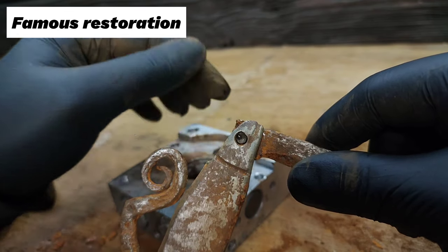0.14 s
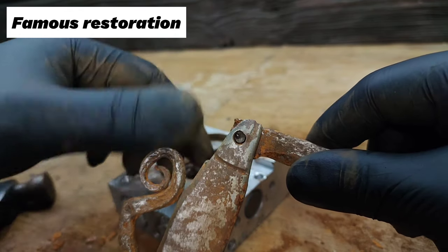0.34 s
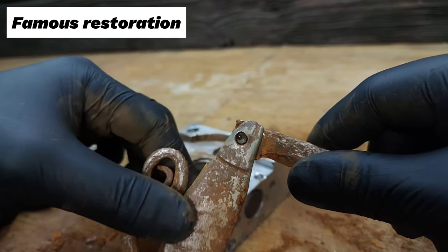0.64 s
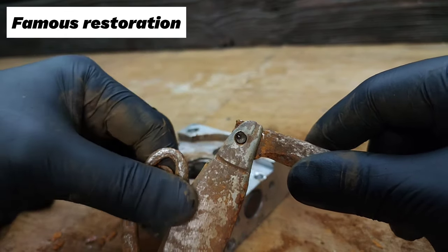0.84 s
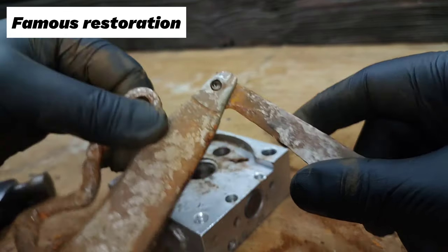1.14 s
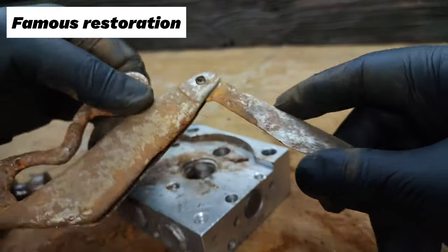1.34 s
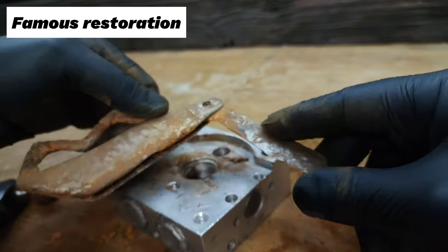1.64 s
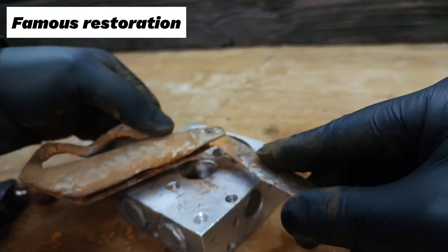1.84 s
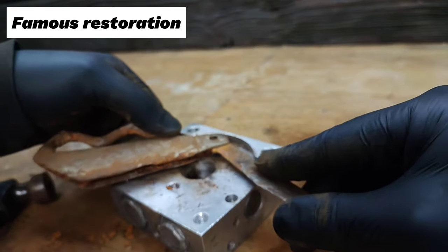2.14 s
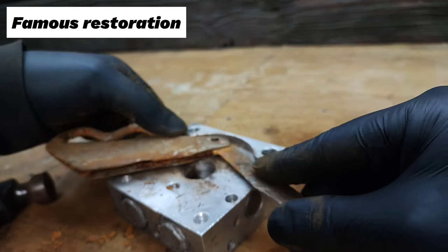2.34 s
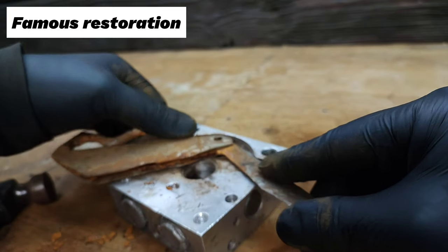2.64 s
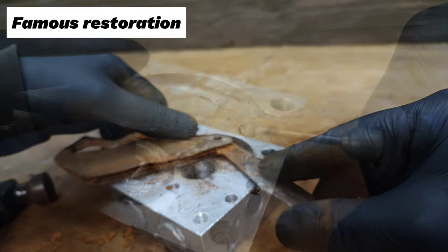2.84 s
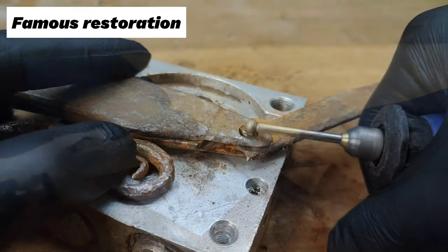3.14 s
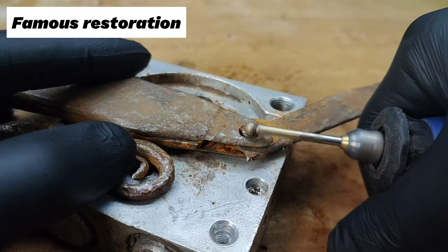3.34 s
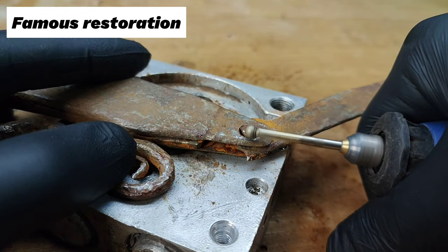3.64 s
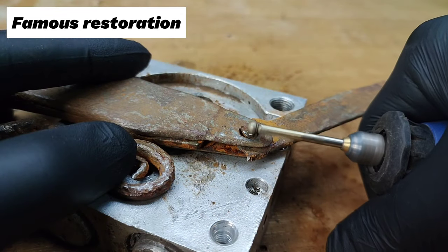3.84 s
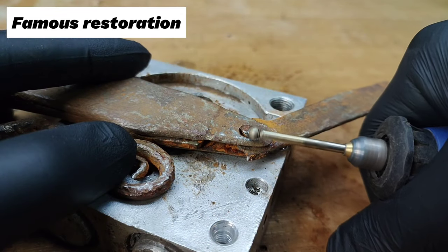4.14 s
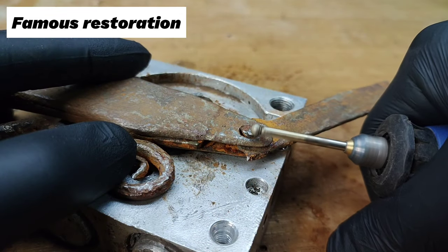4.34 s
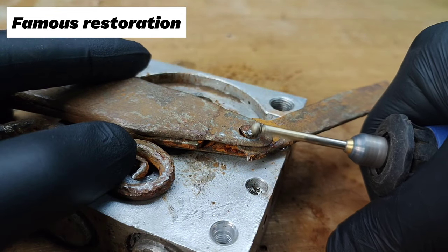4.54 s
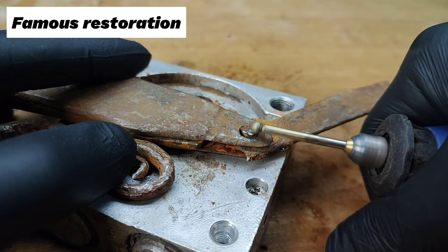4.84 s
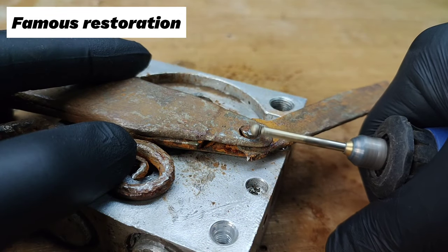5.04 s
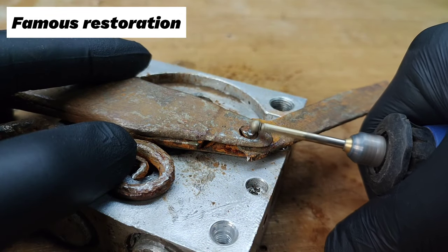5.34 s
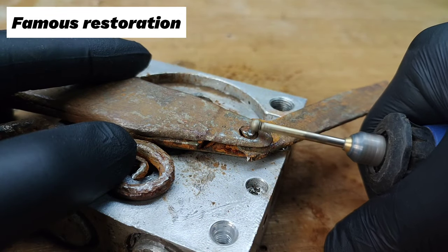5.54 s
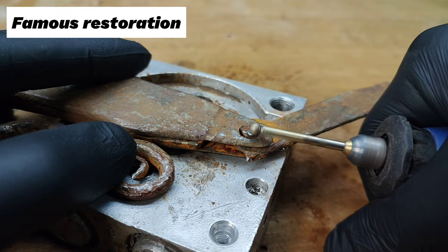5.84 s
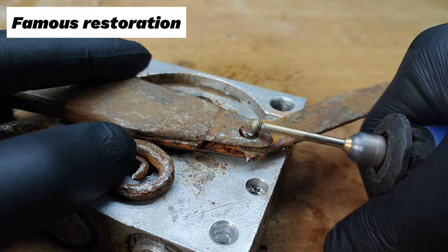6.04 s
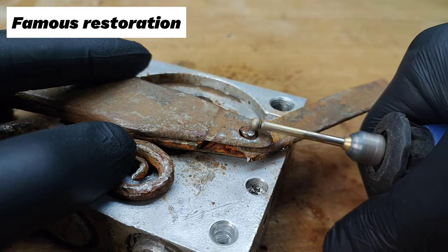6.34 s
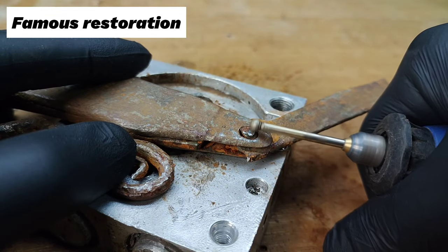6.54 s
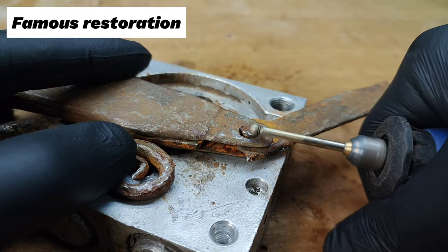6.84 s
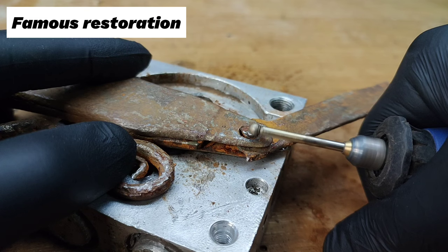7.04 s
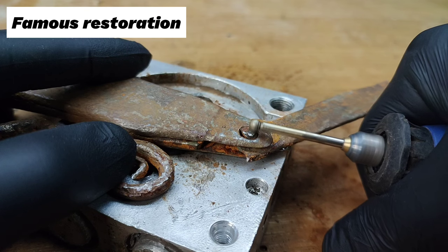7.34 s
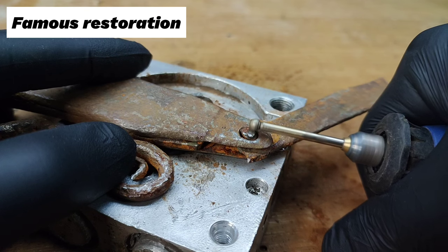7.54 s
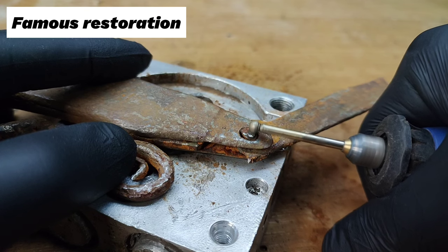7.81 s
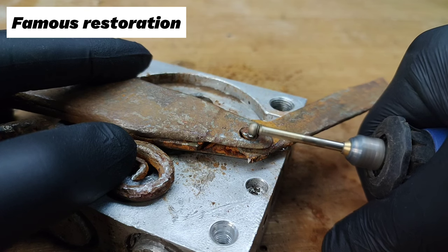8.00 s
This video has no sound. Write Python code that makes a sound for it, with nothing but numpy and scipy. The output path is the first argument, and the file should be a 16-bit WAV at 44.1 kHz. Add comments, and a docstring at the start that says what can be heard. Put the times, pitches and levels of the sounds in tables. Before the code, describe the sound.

A rusty folding knife faintly clicks and scrapes onto a metal block, then a small rotary grinder bites in, buzzing harshly and slowly bogging down.

```python
"""A small workshop, heard close to the bench on two microphones. A rusty folding knife is handled and laid on a
metal block: its joint and hook click as ringing modes, rubs are gritty noise, the wooden bench thuds.
Then a rotary tool with a burr grinds the rivet: slightly out of true, it bites once a turn with strikes that
mostly repeat and ring the metal. Under load the motor slows and each bite lasts longer. The bench shakes,
the motor hums and whines, and the room answers over faint air."""
import sys
import numpy as np
from scipy import signal
from scipy.fft import rfft, irfft
from scipy.io import wavfile
from scipy.ndimage import uniform_filter1d, map_coordinates

SR = 44100
rng = np.random.default_rng(int(sys.argv[2]) if len(sys.argv) > 2 else 0)


def inscribe(sig):
    """Save sig as 16-bit PCM at rate SR to the path in sys.argv[1].

    A 1-D sig is mono; a 2-D sig holds one channel per row.
    Samples are clipped to [-1, 1] before scaling.
    """
    pcm = np.round(np.clip(np.atleast_2d(sig).T, -1, 1) * 32767)
    wavfile.write(sys.argv[1], SR, pcm.astype(np.int16))


N = 360297
TIME = np.arange(N) / SR  # s
HZ = np.fft.rfftfreq(N, 1 / SR)

# Spindle speed, sagging under load. Each row: time in seconds, turns per second.
SPINDLE = [(2.98, 220.1), (3.17, 219.0), (3.4, 213.0), (3.41, 211.2), (3.6, 204.1), (4.01, 198.5),
           (4.27, 193.1), (4.5, 192.5), (4.99, 194.4), (5.58, 189.3), (6.0, 183.0), (6.1, 183.5),
           (6.36, 180.6), (6.87, 172.6), (6.96, 172.3), (7.24, 174.3), (7.58, 171.8), (7.94, 163.1),
           (8.07, 161.9), (8.17, 161.7)]
IDLE_HZ, LOADED_HZ = 220, 162  # turns per second at load 0 and load 1
# Share of each turn that the burr spends in the metal, running free and at full load.
CONTACT_IDLE, CONTACT_LOADED = 0.33, 0.53
# Pressure of the burr, eased on and then held against the rivet. Each row: time in seconds, level in dB.
CUT_LEVEL = [(2.99, -48), (3.2, -31.5), (3.44, -29.5), (3.52, -27.5), (3.9, -22), (4.65, -23.5),
             (5.1, -22.5), (5.6, -21.5), (7.2, -23), (8.17, -23)]
# The burr digs in. Each row: middle in seconds, length in seconds, change of the cut in dB, of the bench in dB.
DIGS = [(3.96, 0.17, 1.5, 6), (4.2, 0.088, 0.5, 13), (4.31, 0.24, 2, -7), (4.49, 0.26, 2.5, -4),
        (4.96, 0.44, 2, 1), (5.68, 0.13, 1, -2), (5.96, 0.16, -0.5, 16), (6.46, 0.087, 2, 8),
        (6.99, .1, 1, 13), (7.33, 0.065, 4, 21), (8.15, 0.11, 0, 21)]
# Brief changes of the cut's level, mostly dips. Each row: middle in seconds, length in seconds, change in dB.
DIPS = [(3.76, 0.081, -2.5), (4.02, 0.089, -5.5), (4.155, 0.099, -2.5), (4.235, 0.082, -3.5),
        (4.39, 0.17, -3.5), (4.74, 0.26, -0.5), (5.25, 0.077, 0.5), (5.77, 0.15, -5.5), (6.1, 0.22, -3),
        (6.28, 0.14, -2), (7.14, 0.054, -5.5)]
# Clean shavings, blade ringing and chips flying. Each row: middle in seconds, length in seconds,
# lift of the blade in dB, lift of the chips in dB.
SHAVINGS = [(3.55, 0.55, 0, 4.5), (4.09, 0.1, 1, 5), (4.26, 0.047, 8, 1), (5.15, 0.12, 6, 4),
            (5.43, 0.075, 0, 0), (5.68, 0.73, 3, 2), (5.92, 0.43, 1, 1.5), (6.42, 0.17, 1.5, 0),
            (6.76, 0.31, 1, 3.5), (7.45, .14, 3, 0), (7.92, 0.33, 1.5, 4)]
# The burr skids and the knife's body growls. Each row: middle in seconds, length in seconds,
# loose strikes added, as a ratio to the repeating ones.
SKIDS = [(3.93, 0.2, 0.66), (4.58, 1, 0.46), (6.55, 1, 0.27), (7.88, 1, 0.54)]
STEADY_SKID = 0.36  # the same ratio at full load while the burr tracks its groove
BETWEEN, GRAZE = 0.25, 0.19  # loose rubbing, and strikes between bites, relative to a bite
# Broad colour of the cut. Each row: frequency in Hz, gain in dB.
CUT_COLOUR = [(25, 12.5), (70, -18.5), (130, 1.5), (270, -0.5), (450, -2), (700, -4.5), (1200, 3),
              (1750, 2.5), (2100, -2), (3350, -6.5), (4800, -4.5), (6700, -4), (9200, -7.5), (10400, -6),
              (12500, -8.5), (14400, -9.5)]
# Resonances of knife, block and shank. Each row: frequency in Hz, width in Hz, lift in dB at a light touch,
# lift in dB bearing down.
BODY = [(294, 25, 5.5, 1), (563, 10.3, 4.5, 19.5), (863, 155, 8, 11), (1526, 96, 5, 1.5),
        (1940, 160, 5, 4.5), (2484, 405, 6.5, 9.5), (3130, 83, 5, 6), (4110, 540, 11, 7.5),
        (4620, 310, 5, 5.5), (5030, 185, 4.5, 8.5), (5940, 260, 5.5, 7), (6430, 200, 4.5, 2),
        (7100, 370, 3, 4.5), (7655, 760, 8, 6), (8770, 260, 3.5, 3.5), (9220, 380, 6.5, 2),
        (11420, 970, 6.5, 8.5), (13000, 1900, 3.5, 7)]
HEAVY_LOAD = 0.61  # load (0-1) above which the bearing-down lifts take over
# How the metal radiates to the two microphones. Each row: frequency in Hz, radians by which the left leads.
LEAD = [(200, -1.5), (520, 4.5), (1000, -2), (1700, -3), (2400, -2), (3300, -0.9), (4300, -1.75),
        (5000, -3), (5700, -0.1), (7800, -0.55), (9300, -1.5), (11000, -1.5)]
# Balance of the tool between the microphones. Each row: frequency in Hz, left minus right in dB.
BALANCE = [(60, 37), (110, -4), (200, 1.5), (380, 6.5), (690, 0.5), (1270, -6.5), (2350, 1.5), (4320, -1.5),
           (7960, -2.5), (14700, 5)]
# The burr falls in step with its own marks and a resonance sings. Each row: middle in seconds,
# length in seconds, frequency in Hz, width in Hz, level in dB before the fade in and out.
SINGS = [(3.127, 0.08, 2360, 500, -29), (3.297, 0.28, 4520, 696, -30.5), (3.347, 0.33, 2430, 500, -41),
         (3.554, 0.45, 4340, 600, -26), (3.563, 0.38, 5850, 507, -30.5), (3.789, 0.25, 2400, 560, -20.5),
         (3.933, 0.32, 4110, 500, -26), (3.96, .14, 7580, 600, -26), (4.064, 0.19, 2530, 238, -23),
         (4.086, .12, 4940, 450, -22), (4.188, 0.089, 4160, 450, -28), (4.198, 0.12, 7650, 550, -21.5),
         (4.32, 0.061, 4300, 500, -30), (4.391, 0.16, 2350, 545, -18.5), (4.457, 0.23, 1940, 220, -28),
         (4.54, 0.1, 7460, 500, -25.5), (5.04, 0.084, 7550, 600, -22), (5.054, 0.077, 2480, 250, -25),
         (5.114, 0.67, 4340, 400, -21.5), (5.17, .14, 9200, 450, -22), (5.33, 0.11, 7700, 550, -24.5),
         (5.486, 0.12, 4180, 447, -24), (5.658, 0.27, 4450, 850, -24), (5.684, 0.17, 5850, 450, -30.5),
         (5.822, 0.16, 5870, 550, -24.5), (5.824, .14, 4840, 550, -24), (5.927, 0.16, 11350, 500, -23.5),
         (5.964, 0.13, 2420, 500, -24), (6.034, .1, 4150, 400, -25.5), (6.325, 0.28, 6950, 500, -34),
         (6.346, 0.11, 4100, 450, -37), (6.477, 0.14, 2450, 402, -23.5), (6.667, .16, 8100, 600, -25),
         (6.975, 0.18, 2520, 300, -31), (7.118, 0.45, 4170, 400, -23), (7.523, 0.2, 4300, 450, -26),
         (7.88, 0.21, 1890, 250, -26.5), (8.02, 0.074, 3800, 500, -21.5), (8.16, 0.13, 4200, 500, -20)]
# Hum of the imbalance, once a turn. Each row: time in seconds, level in dB before the motor's own trim.
HUM = [(2.98, -49.5), (3.31, -50), (3.47, -26), (3.82, -37), (3.96, -27.5), (4.3, -30.5), (4.42, -43),
       (4.55, -34), (5.15, -32.5), (5.6, -27.5), (5.9, -23.5), (6.14, -30), (6.48, -23.5), (6.82, -35),
       (7.3, -30.5), (7.86, -33.5), (7.97, -49), (8.09, -26.5)]
# Its overtone, twice a turn. Each row: time in seconds, level in dB before the same trim.
OVERTONE = [(2.979, -73), (3.48, -38), (3.831, -45.5), (3.96, -37.5), (4.3, -36), (4.65, -42), (5.35, -35),
            (5.5, -66), (5.7, -31.5), (5.88, -37.5), (6.0, -48), (6.3, -45.5), (6.68, -32), (6.82, -44.5),
            (7.25, -37.5), (7.46, -46), (7.62, -31), (8.05, -28)]
# Motor whine. Each row: multiple of the spindle speed, level in dB before pressure and resonances.
WHINE = [(3, -44), (4, -46), (5, -49), (6, -45), (7, -42.5), (8, -42.5), (9, -42), (10, -44.5), (11, -39.5),
         (12, -44.5), (13, -50.5), (14, -42.5)]
# Light clicks of the knife's joint. Each row: time in seconds, peak in dB before the ticks' common lift,
# brightness in Hz, factor on the modes' pitch.
TICKS = [(0.788, -53, 3940, 1), (0.9637, -54, 2450, 1), (1.1721, -40, 3000, 0.83),
         (1.3548, -49, 2940, 0.93), (1.531, -47, 7000, .98), (1.5683, -30.5, 4130, 1),
         (1.6102, -50, 7660, 1), (1.817, -50, 3020, 0.75), (2.001, -46.5, 3000, 1)]
# Ringing of the rusty joint. Each row: frequency in Hz before that factor, level in dB, T60 in seconds.
JOINT_MODES = [(3015, -16, 0.044), (3390, -1, 0.025), (3710, 1, .022), (4300, -8, .02), (4640, 0, 0.041),
               (5060, 0, 0.039), (5400, -6, .02), (6900, -7, .048), (7600, -9, 0.06), (8403, -10, .066),
               (9324, -14, .09), (11300, -8, 0.022)]
# The knife's curled hook slips and taps. Each row: time in seconds, peak in dB.
SLIPS = [(1.203, -45), (1.218, -51), (1.2423, -42), (1.26, -36), (1.282, -55), (1.305, -50)]
# Ringing of the hook. Each row: frequency in Hz, level in dB, T60 in seconds.
HOOK_MODES = [(2930, -5, 0.038), (4360, 2, 0.035), (4760, -16, 0.27), (5400, -13, .03), (7375, -14.5, 0.42),
              (11960, -17, .14)]
# The knife is set down on the block. Each row: time in seconds, peak in dB, dulling in dB per octave.
KNOCKS = [(2.474, -42, 3), (2.853, -23, 2)]
# Ringing of the block. Each row: frequency in Hz before the knock's pitch factor, level in dB, T60 in seconds.
BLOCK_MODES = [(580, -12, 0.04), (740, -0.5, .03), (1546, -3, 0.039), (3110, -3, 0.038), (3400, -2, 0.022),
               (3780, 1, 0.038), (7880, -13, .05)]
# One hard clack of steel on steel: seconds, peak in dB, dulling in dB per octave (negative brightens).
CLACK_S, CLACK_DB, CLACK_DULL_DB = 2.957, -8, -5
# Ringing of the struck steel. Each row: frequency in Hz before the clack's pitch factor, level in dB,
# T60 in seconds.
STEEL_MODES = [(625, -17, 0.04), (1766, 16, 0.022), (2900, -17, 0.02), (3404, 11, 0.034), (3800, 2, 0.019),
               (4760, 5, 0.038), (4900, 0, 0.018), (6360, 4.5, 0.0098), (7000, 1, 0.029),
               (10200, -24, 0.015)]
# Thuds of the bench. Each row: start in seconds, level in dB, T60 in seconds, lower and upper edge in Hz.
THUDS = [(0.631, -44, 0.43, 25, 90), (2.472, -39, 0.56, 40, 336), (2.851, -41.5, 0.4, 40.6, 645),
         (2.958, -26.5, 1.4, 50, 77), (2.96, -29, 0.58, 122, 237)]
# Gloves and rust rubbing. Each row: start in seconds, length in seconds, level in dB, centre in Hz.
RUBS = [(0, 0.12, -74, 7350), (0.273, 0.13, -59, 3500), (0.76, 0.25, -59, 6000), (1.103, 0.23, -58.5, 700),
        (1.134, 0.45, -61, 4970), (1.473, 0.42, -58.5, 4970), (1.962, 0.17, -56, 7000),
        (2.434, 0.24, -56.5, 2800)]
# Low rumble of the hands on the bench. Each row: time in seconds, level in dB before the rumble's lift.
RUMBLE = [(0.05, -47.5), (0.5, -50), (0.7, -41.5), (1.45, -49), (1.9, -46), (2.15, -50), (2.6, -49),
          (3.0, -38), (3.25, -49)]
# Colour of that rumble. Each row: frequency in Hz, gain in dB.
RUMBLE_COLOUR = [(10, -2), (22, 3), (30, -13), (42, -9), (70, -14), (130, -47), (300, -54), (1000, -70)]
# Decay of the room. Each row: frequency in Hz, T60 in seconds.
ROOM_T60 = [(100, 1), (1000, 0.89), (5000, 0.73), (14000, 0.011)]
# Colour of the air. Each row: frequency in Hz, gain in dB.
AIR_COLOUR = [(59, -41), (100, 0.5), (355, -9.5), (1460, -22.5), (3340, -26.5), (5860, -31.5), (7360, -28),
              (10000, -35.5), (12600, -31), (14300, -31)]
AIR_DB = -54
EDGE_HZ = 14450  # upper limit of the recorder


def grinding(turns, apart=0.72, bench_db=-14, judder_db=1.76):
    """The bites ring the knife; load brightens the ring, skids and shavings shift which parts ring most."""
    effort, skid = load(), swells(SKIDS)[0]
    blade_lift, chips_lift = swells(SHAVINGS)
    push, drag = (bites(turns, STEADY_SKID * effort + skid) for _ in range(2))
    x = through_body(radiated(push, drag, apart), read(CUT_COLOUR, HZ))
    close_echoes = echoes(x, [(200, 0.062), (10000, 0.007)], gap_s=0.00013)
    x = band(x + amp(bench_db) * close_echoes, 41, SR, order=1)

    low = band(x, 1, 1850, order=14)
    handle = band(x, 1850, 2800, order=14)
    blade = band(x, 5200, 6600, order=14)
    chips = band(x, 9800, SR, order=14)
    shank = x - low - handle - blade - chips
    parts = [(shank, 1.5 * effort),
             (low, -11 + 6 * skid),
             (handle, -8.5 + 3 * effort),
             (blade, -11 + 6 * effort + blade_lift),
             (chips, -6.5 + 2 * effort + chips_lift)]
    level_db = cut_db()
    out = np.zeros((2, N))
    for part, db in parts:
        # each part swells and sinks a little as the hand judders
        out += steadied(part, span_s=0.057) * amp(level_db + db + judder_db * wander(25))
    return out


def bites(turns, skid, uneven_db=1.4, chips=0.74, spray=1.0, spray_hz=8500):
    """One burst of strikes a turn: coarse ridges repeat, fine chips do not; grazing and spray fill the gaps."""
    count = turns.astype(int)
    force = amp(uneven_db * rng.standard_normal(count[-1] + 1))[count]
    loose, fine, rub, dust = rng.standard_normal((4, N))
    ridges = band(tooth_marks(turns, memory_turns=23), 385, 19000, order=4)
    fine = band(fine, 10000, SR, order=4)
    strikes = (ridges + skid * loose + chips * fine) / np.sqrt(1 + skid ** 2)
    cut = strikes * (biting(turns) * force + GRAZE) + BETWEEN * rub
    return unit(cut + spray * band(dust, spray_hz, SR, order=4))


def tooth_marks(turns, memory_turns, size=300):
    """The burr meets nearly the same ridges on each turn, and slowly wears new ones."""
    keep = np.exp(-1 / memory_turns)
    fresh = rng.standard_normal((int(turns[-1]) + 2, size))
    start = rng.standard_normal((1, size))
    ridges, _ = signal.lfilter([np.sqrt(1 - keep ** 2)], [1, -keep], fresh, axis=0, zi=start)
    return unit(map_coordinates(ridges.ravel(), [turns * size], order=3))


def biting(turns):
    """Force on the burr through each turn: it meets the metal once, for longer as the load grows."""
    contact = CONTACT_IDLE + (CONTACT_LOADED - CONTACT_IDLE) * load() ** 2
    return np.sqrt(np.sin(np.pi * np.minimum(turns % 1 / contact, 1)).clip(0))


def load():
    """How hard the motor labours, 0-1, read from its loss of speed."""
    return np.clip((IDLE_HZ - curves(SPINDLE)[0]) / (IDLE_HZ - LOADED_HZ), 0, 1)


def cut_db():
    """Strength of the cut: the hand's pressure, with its digs and brief dips."""
    return curves(CUT_LEVEL)[0] + swells(DIGS)[0] + swells(DIPS)[0]


def radiated(push, drag, apart):
    """Push and sideways drag radiate differently to each microphone."""
    sides = rfft([push + apart * drag, push - apart * drag])
    return irfft(sides * np.exp(1j * np.outer([.5, -.5], read(LEAD, HZ))), N)


def through_body(x, base_db):
    """Rings the metal's resonances, with light-touch lifts until the load turns heavy."""
    hz, width, *lifts = np.transpose(BODY)
    grid = np.linspace(0, SR / 2, 8192)
    peaks = .5 ** ((2 * (grid[:, None] - hz) / width) ** 2)
    light, heavy = (colour(x, base_db + np.interp(HZ, grid, peaks @ db)) for db in lifts)
    return np.where(load() > HEAVY_LOAD, heavy, light)


def singing(turns, apart=0.38, loose=0.31):
    """Strikes that repeat almost exactly from turn to turn swell through single resonances."""
    push, drag = ((tooth_marks(turns, memory_turns=29) + loose * rng.standard_normal(N)) * biting(turns)
                  for _ in range(2))
    strikes = np.pad(radiated(push, drag, apart), [(0, 0), (0, SR)], mode="reflect")
    out = np.zeros((2, N))
    for s, length, hz, width, db in SINGS:
        start, size = s - length / 2, round(length * SR)
        peak = .5 ** (2 * ((np.fft.rfftfreq(size, 1 / SR) - hz) / width) ** 2)
        excerpt = strikes[:, round(start * SR):][:, :size]
        ring = irfft(rfft(excerpt) * peak, size)
        add(out, start, amp(db) * unit(ring) * np.hanning(size) ** 0.82)
    return out


def motor(turns, shake_db=-1, unsteady_db=2.0, waver_db=3.0, rough_db=2.3, fade_db=1.0, full_db=-21):
    """Imbalance hums on the first two orders; the higher orders whine roughly through the resonances."""
    angle = 2 * np.pi * turns
    hum = np.zeros(N)
    for order, level in enumerate([HUM, OVERTONE], 1):
        hum += amp(curves(level)[0] + unsteady_db * wander(11.5)) * np.sin(order * angle)
    whine = np.zeros((2, N))
    for order, db in WHINE:
        flutter_db = waver_db * wander(25.5) + fade_db * wander(2.4) + rough_db * wander(160)
        # radians: a chance start, and a lag between the microphones that grows with the order
        phase = 2 * np.pi * rng.random() + order * 0.078 * np.array([[-1], [1]])
        whine += amp(db + flutter_db) * np.sin(order * angle + phase)
    pressed = amp(curves(CUT_LEVEL)[0] - full_db)
    return np.sqrt(2) * (amp(shake_db) * hum + pressed * through_body(whine, 0))


def bench(tremor_db=-58, low_hz=45, top_hz=110):
    """The pressed tool shakes the bench top in low noise that changes as the burr digs in."""
    pressing = np.interp(TIME, [3.35, 3.5], [0, 1])
    tremor = unit(band(noise_pair(N, apart=0.26), low_hz, top_hz, order=2))
    return pressing * amp(tremor_db + swells(DIGS)[1]) * tremor


def clicks(tick_db=5, bright_hz=5000):
    """Short snaps of the rusty joint, the ringing hook, dry knocks on the block and one hard clack."""
    out = np.zeros((2, N))
    for s, db, hz, pitch in TICKS:
        dull_db = 4 * np.log2(bright_hz / hz)
        add(out, s, amp(db + tick_db) * strike(JOINT_MODES, pitch, dull_db, blow_s=0.0011,
                                               crack=1.0, crack_t60=0.033, crack_hz=2000))
    for s, db in SLIPS:
        add(out, s, amp(db) * strike(HOOK_MODES, 1, 0, blow_s=0.0022,
                                     crack=.6, crack_t60=0.025, crack_hz=2500))
    for s, db, dull_db in KNOCKS:
        add(out, s, amp(db) * strike(BLOCK_MODES, 0.97, dull_db, blow_s=0.0032,
                                     crack=.25, crack_t60=0.019, crack_hz=300))
    add(out, CLACK_S, amp(CLACK_DB) * strike(STEEL_MODES, 0.97, CLACK_DULL_DB, blow_s=0.0024,
                                             crack=.7, crack_t60=0.017, crack_hz=300))
    return out


def strike(modes, pitch, dull_db, blow_s, crack, crack_t60, crack_hz):
    """Rough faces meet in a quick rattle of contacts that rings the modes; dulling tilts the treble down."""
    t = TIME[:SR // 4]
    ring = sum(amp(db - 60 * t / t60) * np.sin(2 * np.pi * hz * pitch * t) for hz, db, t60 in modes)
    blow = noise_pair(len(t), apart=0.51) * np.exp(-t / blow_s)
    burst = noise_pair(len(t), apart=0.79) * amp(-60 * t / crack_t60)
    snap = signal.lfilter(*signal.butter(2, crack_hz, "high", fs=SR), burst)
    rung = signal.fftconvolve(blow, ring[None], axes=1)[:, :len(t)]
    sound = unit(rung) + crack * snap
    octaves = np.log2(1 + np.fft.rfftfreq(2 * len(t), 1 / SR) / 1000)
    sound = irfft(rfft(sound, 2 * len(t)) * amp(-dull_db * octaves))[:, :len(t)]
    return sound / abs(sound).max()


def handling():
    """Hands at the bench: their rumble, decaying bands of noise for thuds, and gritty rubbing."""
    return rumbling() + thudding() + rubbing()


def rumbling(rumble_db=6):
    """Moving hands shake the bench in low coloured noise, until the tool is pressed on."""
    moving = np.interp(TIME, [3.35, 3.55], [1, 0])
    rumble = steadied(colour(noise_pair(N, apart=0.49), read(RUMBLE_COLOUR, HZ)), span_s=0.36)
    return moving * amp(curves(RUMBLE)[0] + rumble_db) * rumble


def thudding():
    """The knocked wood booms in a low band that dies away exponentially."""
    out = np.zeros((2, N))
    t = TIME[:SR]
    for s, db, t60, low_hz, top_hz in THUDS:
        edges = signal.butter(2, [low_hz, top_hz], "band", fs=SR, output="sos")
        boom = signal.sosfilt(edges, noise_pair(SR, apart=0.25))
        add(out, s, unit(boom) * amp(db - 60 * t / t60))
    return out


def rubbing():
    """Gloves and rust catch unevenly: noise of fluttering level in a broad band."""
    out = np.zeros((2, N))
    for s, length, db, hz in RUBS:
        size = round(length * SR)
        catching = amp(2.1 * wander(150) + 2 * wander(28))[:size]
        grit = noise_pair(SR, apart=1.0)[:, :size] * catching
        edges = [hz * 0.24, min(hz * 1.47, SR / 2 - 1)]
        rub = signal.lfilter(*signal.butter(1, edges, "band", fs=SR), grit)
        add(out, s, amp(db) * unit(rub) * signal.windows.tukey(size, .7))
    return out


def echoes(x, t60, gap_s):
    """Dense reflections, different on each side, each band dying at its own speed."""
    hz, t, z = signal.stft(rng.standard_normal((2, SR // 2)), SR, nperseg=128)
    tail = signal.istft(z * amp(-60 * t / read(t60, hz)[:, None]), SR, nperseg=128)[1]
    tail *= TIME[:tail.shape[1]] > gap_s
    tail /= np.linalg.norm(tail, axis=1, keepdims=True)
    return signal.fftconvolve(x, tail, axes=1)[:, :N]


def air():
    """Steady coloured noise behind everything, nearly separate at the two microphones."""
    return amp(AIR_DB) * unit(colour(noise_pair(N, apart=0.95), read(AIR_COLOUR, HZ)))


def amp(db):
    """Decibels to gain."""
    return 10 ** (np.asarray(db) / 20)


def unit(x):
    """Scales to rms 1."""
    return x / np.sqrt(np.mean(x ** 2) + 1e-20)


def steadied(x, span_s):
    """Evens out the slow swells of a stereo sound, to rms 1."""
    power = uniform_filter1d((x ** 2).mean(0), round(span_s * SR))
    return x / np.sqrt(abs(power) + 1e-12)


def curves(rows):
    """Each column of a table, at every sample."""
    s, *columns = np.transpose(rows)
    return [np.interp(TIME, s, c) for c in columns]


def swells(rows):
    """Each column of an event table as smooth rises and falls, at every sample."""
    total = 0
    for s, length, *sizes in rows:
        swell = np.cos(np.pi * np.clip((TIME - s) / length, -.5, .5)) ** 2
        total = total + np.outer(sizes, swell)
    return total


def read(points, hz):
    """A spectrum joined by straight lines over log frequency."""
    f, value = np.transpose(points)
    return np.interp(np.log(hz + 1), np.log(f), value)


def add(mix, s, sound):
    """Mixes a sound in at s seconds."""
    part = mix[..., round(s * SR):][..., :sound.shape[-1]]
    part += sound[..., :part.shape[-1]]


def colour(x, db):
    """Causal (minimum-phase) filter with the given gain at every frequency."""
    cepstrum = irfft(db * np.log(10) / 20, N)
    cepstrum[1:N // 2] *= 2
    cepstrum[N // 2 + 1:] = 0
    response = irfft(np.exp(rfft(cepstrum)), N)[:SR // 5]
    return signal.oaconvolve(np.atleast_2d(x), response[None], axes=1)[:, :N]


def band(x, lo_hz, hi_hz, order):
    """The part of x between two soft edges."""
    low_edge = 1 + (lo_hz / (HZ + 1)) ** (2 * order)
    high_edge = 1 + (HZ / hi_hz) ** (2 * order)
    return irfft(rfft(x) / low_edge / high_edge, N)


def wander(per_s):
    """Smooth chance of rms 1, quicker for a larger rate."""
    steps = rng.standard_normal(N // 100)
    speed = np.fft.rfftfreq(len(steps), TIME[-1] / len(steps))
    smooth = unit(irfft(rfft(steps) * np.exp(-(speed / per_s) ** 2), len(steps)))
    return np.interp(TIME, np.linspace(0, TIME[-1], len(steps)), smooth)


def noise_pair(size, apart):
    """Noise that the two microphones partly share."""
    mid, side = rng.standard_normal((2, size))
    return unit(np.array([mid + apart * side, mid - apart * side]))


def scene(tool_room_db=-10, click_room_db=-13):
    """Handling, then the running tool, in a small workshop."""
    turns = np.cumsum(curves(SPINDLE)[0]) / SR
    running = np.interp(TIME, [2.94, 3.0], [0, 1])
    tool = grinding(turns) + singing(turns) + motor(turns)
    balance = amp(np.outer([.5, -.5], read(BALANCE, HZ)))
    tool = running * irfft(rfft(tool) * balance, N)
    snaps = clicks()
    room = echoes(amp(tool_room_db) * tool + amp(click_room_db) * snaps, ROOM_T60, gap_s=0.0027)
    return tool + snaps + room + handling() + bench() + air()


def record(dry):
    """The recorder's ceiling and band limit."""
    held = np.clip(dry, -.9, .9)
    lowpass = signal.firwin(511, EDGE_HZ, window=("kaiser", 9), fs=SR)
    return signal.oaconvolve(held, lowpass[None], "same")


dry = scene()
out = record(dry)
inscribe(out)
```